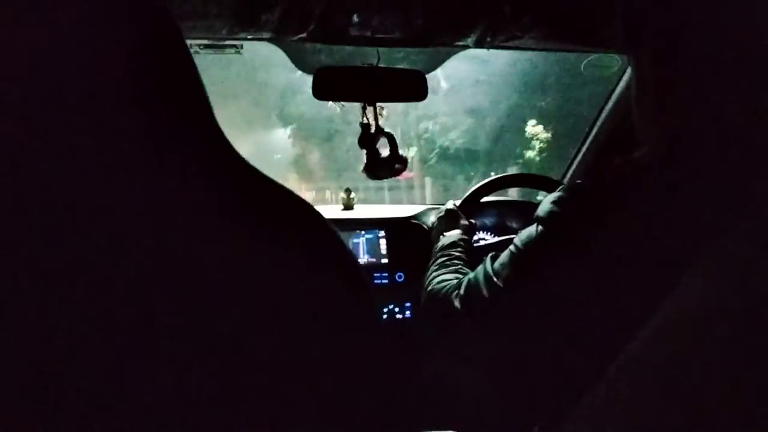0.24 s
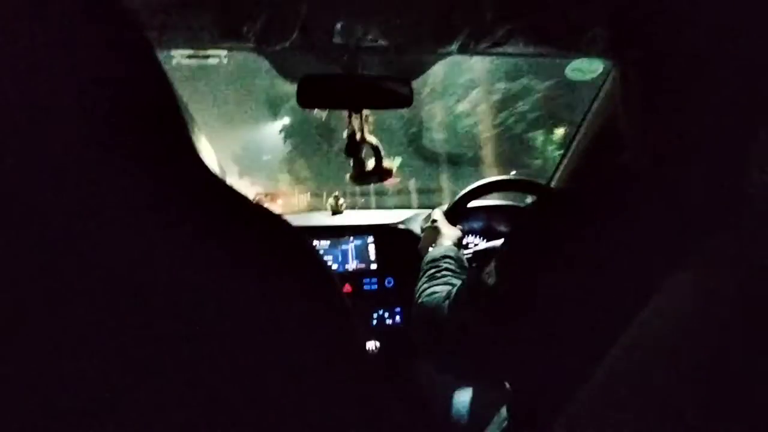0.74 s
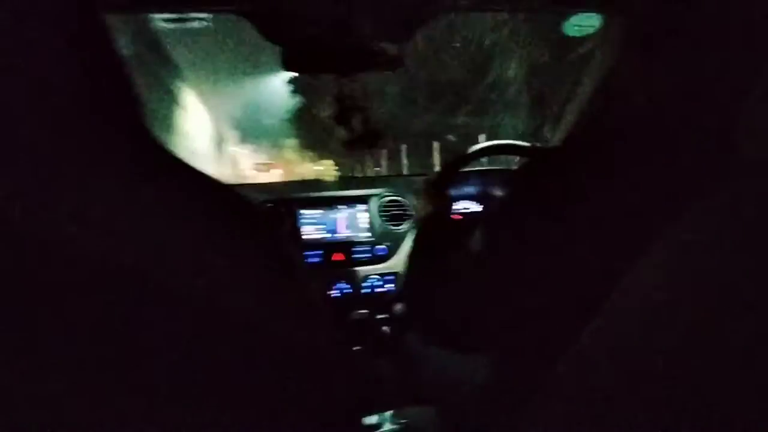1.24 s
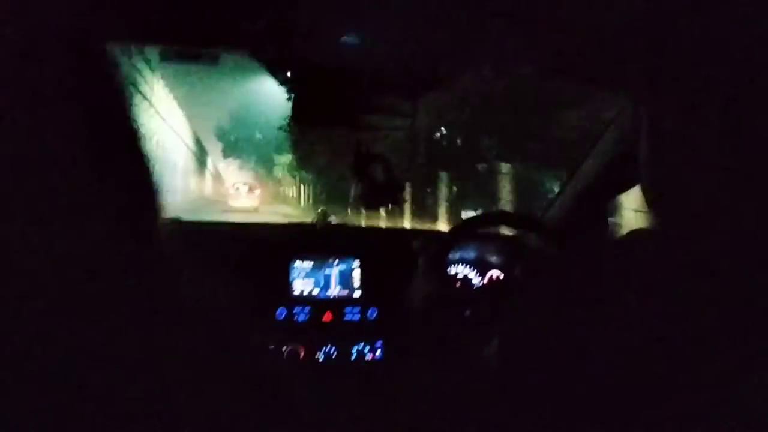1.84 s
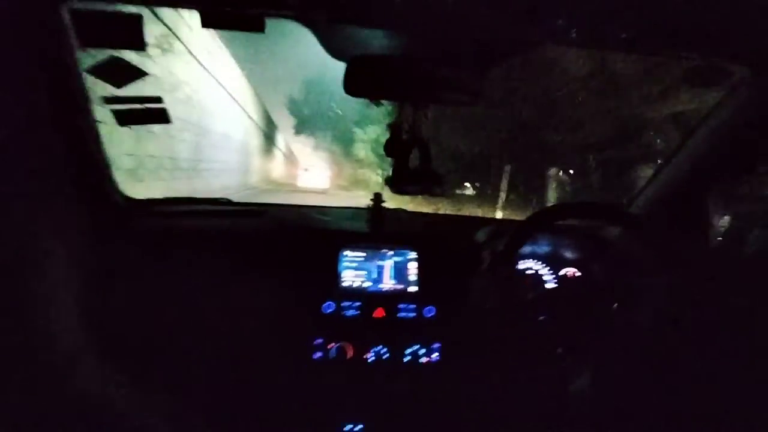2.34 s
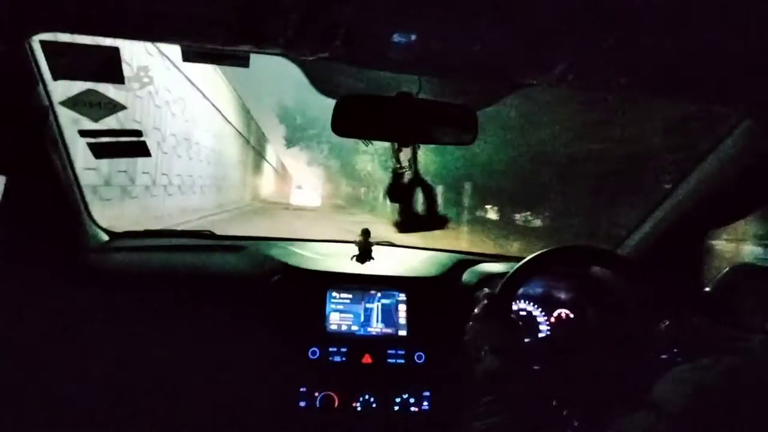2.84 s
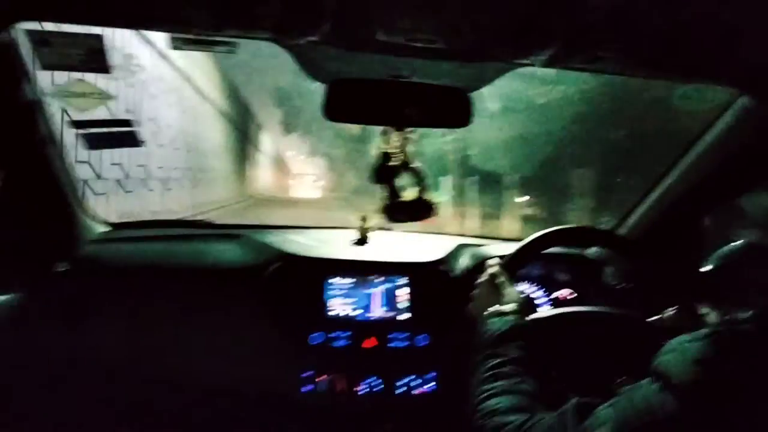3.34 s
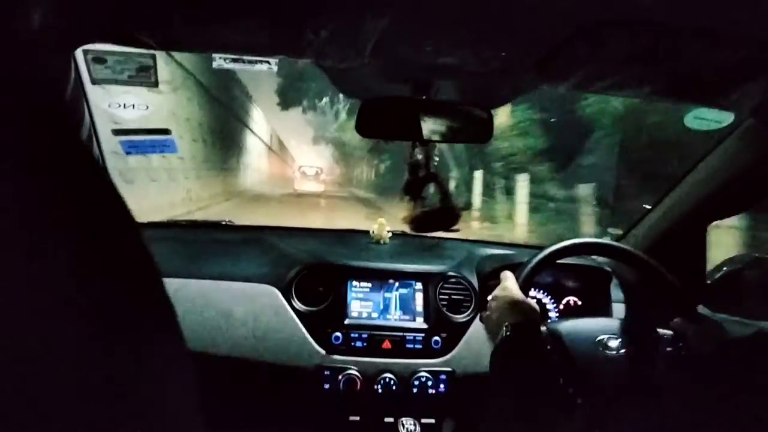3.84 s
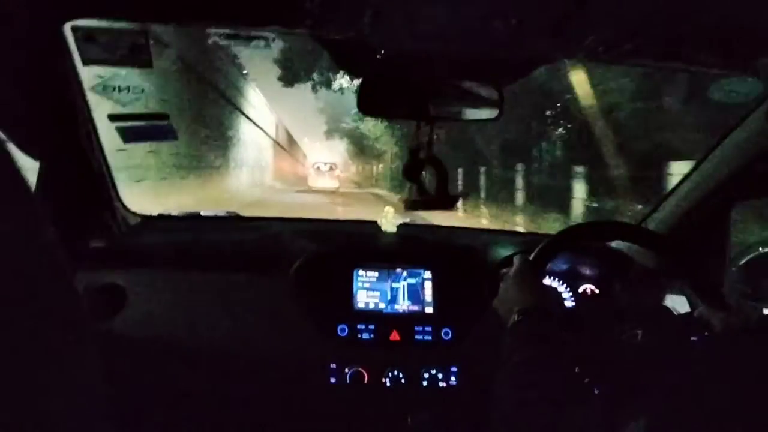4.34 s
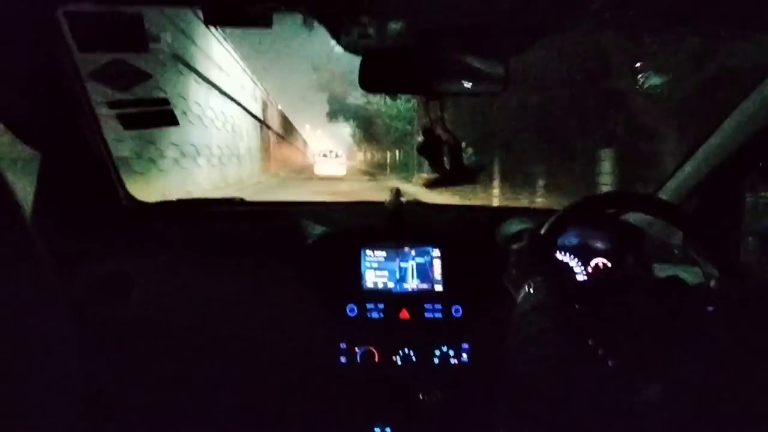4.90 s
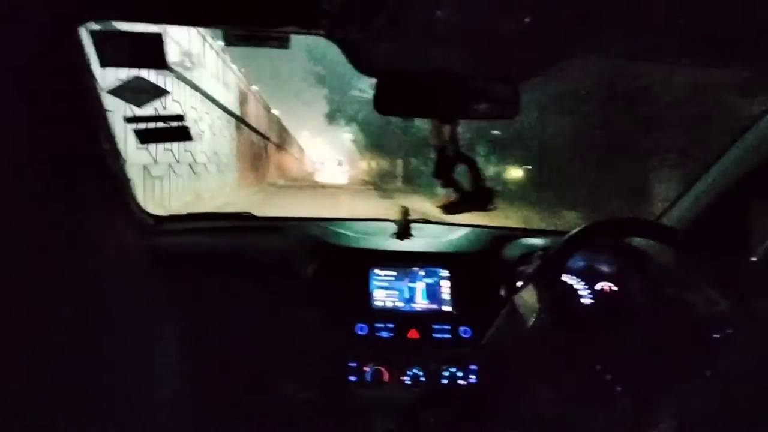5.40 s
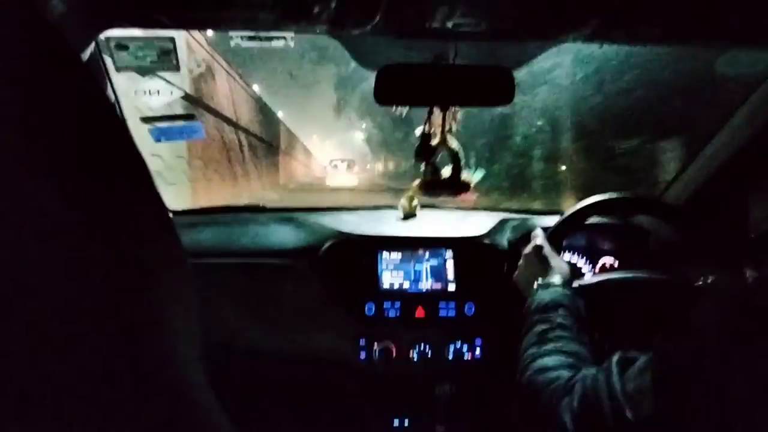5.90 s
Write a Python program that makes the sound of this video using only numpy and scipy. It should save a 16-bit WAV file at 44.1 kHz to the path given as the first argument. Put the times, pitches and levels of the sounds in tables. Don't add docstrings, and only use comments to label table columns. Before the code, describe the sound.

Inside a moving car, low engine hum and rolling road rumble with thuds, brief dropouts and clicks, then a hard booming jolt with rattling panels.

```python
import sys
import numpy as np
from scipy import signal
from scipy.fft import rfft, irfft
from scipy.io import wavfile
from scipy.ndimage import uniform_filter1d

SR = 44100
rng = np.random.default_rng(int(sys.argv[2]) if len(sys.argv) > 2 else 0)


def master_out(mix):
    frames = np.transpose(np.atleast_2d(mix))
    ceiling = np.clip(frames, -1, 1)
    pcm = np.round(ceiling * 32767).astype(np.int16)
    wavfile.write(sys.argv[1], SR, pcm)


def makeup_ratio(level_db):
    decades = np.asarray(level_db, float) / 20
    return 10 ** decades


N = 271567

# pitch_hz, level_db (per Hz)
BOOM_COLOUR = [(7, -34.5), (13, -10.5), (27, 2), (43, 8.5), (60, 1.5), (72, -6.5), (84, -10), (95, -3.5),
               (110, -10.5), (130, -19), (170, -34.5)]
# pitch_hz, level_db (per Hz)
PAN_COLOUR = [(74, -43), (125, -3.5), (156, 7.5), (169, -9.5), (185, -21.5), (240, -65.5), (410, -120)]
# pitch_hz, level_db (per Hz)
ROAR_COLOUR = [(150, -44), (185, -5), (248, -2.5), (341, -10.5), (380, -5), (655, -10.5), (850, -15),
               (1200, -12), (1400, -16), (2100, -21.5), (3000, -28), (4200, -35), (4900, -43),
               (6500, -57.5)]
# pitch_hz, level_db (per Hz)
HISS_COLOUR = [(3000, -9), (4200, -6), (5000, -11.5), (5900, -7.5), (6900, -4.5), (8600, -9.5),
               (10700, -8.5), (12500, -17), (14000, -22.5), (15900, -38.5)]
# pitch_hz, width_hz, lift_db
CABIN_MODES = [(46.4, 42, -4.5), (144.3, 6, 0), (208.2, 45, 9.5), (278.5, 57.8, 8.5), (389, 149, 4.5),
               (978, 21, 4.5), (1310, 140, -3)]
# time_s, level_db
HEAVE = [(0, -28.5), (.12, -28), (.32, -20), (.6, -27.5), (.78, -28), (1.2, -27.5), (1.65, -31),
         (2.05, -27.5), (2.47, -25), (2.6, -34.5), (2.85, -29), (3.45, -31.5), (3.72, -26), (4.2, -23.5),
         (4.36, -19), (4.7, -24), (4.85, -29.5), (6.16, -30)]
# peak_s, level_db
PAN_DRUMS = [(.04, -31.5), (0.259, -31.5), (.43, -46.5), (.62, -36), (0.779, -28), (1.331, -35),
             (1.68, -39.5), (2.2, -38.5), (2.65, -47.5), (2.83, -40.5), (3.66, -43), (4.1, -41),
             (4.339, -31.5), (4.47, -28), (4.56, -26.5), (5.74, -39.5)]
# time_s, level_db
AIR = [(0, -73), (1.18, -76.5), (1.26, -64), (1.34, -66), (1.44, -69), (1.49, -64), (1.95, -63),
       (2.08, -66.5), (2.25, -64.5), (2.73, -66.5), (2.79, -72), (3.7, -73), (4.2, -73.5), (4.7, -72.5),
       (5.9, -73.5), (6.16, -70)]
# time_s, pitch_hz, level_db
ENGINE = [(0, 73, -35), (.7, 75, -36), (1.4, 76, -38), (2, 78, -35), (2.7, 80, -36), (3.5, 80.5, -36),
          (4.2, 81, -33), (4.9, 82, -34), (5.3, 82, -31.5), (5.8, 82, -31.5), (6.16, 82.5, -33)]
# multiple of the firing rate, level_db, fading_db
FIRING_ORDERS = [(.5, -6, 2.5), (1, -1.5, 1.4), (1.5, -19, 3), (3, -22, 3), (5, -30, 3)]
# time_s, pitch_hz, level_db
WHINE = [(0, 1000, -60), (.4, 990, -59), (1, 985, -60), (1.5, 995, -63), (1.9, 1010, -80)]
# start_s, peak_db, centre_hz, t60_s
TICKS = [(0, -43, 5870, 0.049), (.057, -64, 4000, .06), (.861, -52.5, 5870, 0.07), (.9, -60, 10000, 0.093),
         (.93, -47.5, 9700, 0.053), (.966, -61, 4900, .055), (1.054, -57, 8500, .15),
         (1.103, -43, 8000, 0.073), (1.6, -51, 5600, 0.084), (2.244, -57, 6000, .06),
         (2.312, -56, 7000, .12), (2.436, -47.5, 6000, .05), (3.033, -55, 7500, .08),
         (3.056, -49.5, 6540, .09), (3.152, -49, 8260, .075), (3.207, -46.5, 7350, 0.063),
         (3.408, -57.5, 7000, .06), (3.873, -59.5, 7000, .06), (4.146, -57, 6000, 0.055),
         (4.272, -55, 3500, .08), (4.288, -47.5, 5000, .1), (4.308, -50.5, 6000, 0.071),
         (4.341, -48, 2500, .045), (4.433, -54, 3500, 0.04), (4.544, -44.5, 6000, 0.13),
         (4.771, -63, 8900, .05), (5.295, -67, 7500, .06), (5.454, -67, 7000, .05),
         (6.077, -59.5, 9000, 0.13)]
# start_s, peak_db, centre_hz, t60_s
CLINKS = [
    (.273, -54, 6540, 0.013),
    (1.772, -43, 1730, .047),
    (1.773, -49, 3940, .053),
    (3.06, -54, 2230, 0.054),
    (6.111, -52, 7500, .012),
]
# start_s, peak_db, centre_hz, t60_s
SQUEAKS = [
    (.3, -71, 12000, .6),
    (.35, -72, 12000, .6),
]
# start_s, peak_db, centre_hz, t60_s
SHUDDERS = [
    (4.275, -32, 290, 0.38),
    (4.315, -41.5, 352, 0.53),
    (4.36, -37, 393, 0.3),
    (4.545, -32.5, 327, 0.27),
    (4.63, -36.5, 236, 0.55),
]
# pitch_hz, width_hz, lift_db
PORTS = [(3500, 1500, 12), (6900, 1800, 9), (10800, 3800, 9), (15800, 2700, -20)]
# start_s, peak_db, ring_hz, t60_s
BUMPS = [(0.061, -15.5, 73, 0.41), (0.299, -10.5, 50, 0.27), (4.273, -27, 215, 0.48),
         (4.286, -1.5, 52.7, 0.19), (4.364, -0.5, 38.9, 0.15), (4.454, -6.5, 75, 0.12),
         (4.542, -13, 108.5, 0.17), (4.548, -9, 42, 0.13), (4.564, -5.5, 18.1, 0.54), (4.642, -13, 25, .2),
         (5.198, -10.5, 43, 0.1)]
# time_s, pressure jump (full scale 1)
SKIPS = [(.1918, .029), (.6081, -.108), (.6294, -.02), (.8217, .064), (2.3218, -.045), (2.3467, -.01),
         (2.7514, -.037), (2.9861, -.046), (4.046, .03), (4.0887, .061), (4.11, .03), (4.5811, -.16)]
# cut_s, return_s, pressure at the cut, pressure at the return (full scale 1)
GAPS = [
    (.0981, .1488, .029, .024),
    (.4474, .5224, -.036, -.034),
    (.6931, .7573, -.04, -.037),
    (2.5066, 2.5591, .004, .003),
    (3.9244, 4.0029, -.038, -.037),
    (4.4723, 4.538, .14, .15),
]


def evened(x):
    return x / np.sqrt(np.mean(x ** 2) + 1e-20)


def levelled(x, share):
    power = uniform_filter1d(x ** 2, size=3500)
    return evened(x / (power + 0.078) ** share)


def along(rows, column):
    rows = np.array(rows)
    return np.interp(np.arange(N) / SR, rows[:, 0], rows[:, column])


def bell(x, width):
    return np.exp(-.5 * (x / width) ** 2)


def resonance_db(hz, modes):
    return sum(db / (1 + (2 * (hz - mode) / width) ** 2) for mode, width, db in modes)


def add(mix, start_s, sound):
    part = mix[round(start_s * SR):][:len(sound)]
    part += sound[:len(part)]


def wash(colour, size, patchy_db, flicker_db):
    frames, hz = 4 * N // size + 5, np.fft.rfftfreq(size, 1 / SR)
    real, imaginary, patches = rng.standard_normal((frames, len(hz), 3)).T
    patches = uniform_filter1d(patches, size=10, axis=0)
    patches = evened(uniform_filter1d(patches, size=8, axis=1))
    flicker = evened(uniform_filter1d(rng.standard_normal(frames), size=3))
    pitch_hz, level_db = np.transpose(colour)
    colour_db = np.interp(np.log(hz + 1), np.log(pitch_hz + 1), level_db, left=-120, right=-120)
    colour_db = colour_db + resonance_db(hz, CABIN_MODES)
    gain = makeup_ratio(colour_db[:, None] + patchy_db * patches + flicker_db * flicker)
    noise = signal.istft((real + 1j * imaginary) * gain, nperseg=size, noverlap=3 * size // 4)[1]
    return evened(noise[:N])


def road():
    t = np.arange(N) / SR
    heave_db = along(HEAVE, 1)

    joint_start_s, joint_rise_s, joint_end_s = 4.27, 0.036, 4.578
    fade_s, linger_s, lingering_share = .012, .09, .4
    after = np.maximum(t - joint_end_s, 0)
    fade = (1 - lingering_share) * np.exp(-after / fade_s) + lingering_share * np.exp(-after / linger_s)
    joint = np.clip((t - joint_start_s) / joint_rise_s, 0, 1) * fade

    boom = levelled(wash(BOOM_COLOUR, size=8192, patchy_db=2.0, flicker_db=-1.0), 0.23)
    floor_pan = levelled(wash(PAN_COLOUR, size=4096, patchy_db=1.0, flicker_db=2.0), 0.57)
    roar = wash(ROAR_COLOUR, size=2048, patchy_db=1.5, flicker_db=-0.13)
    hiss = wash(HISS_COLOUR, size=512, patchy_db=1.3, flicker_db=1.1)

    pan_rest_db, pan_swell_s = -45.5, 0.033
    pan_gain = makeup_ratio(pan_rest_db) + sum(makeup_ratio(db) * bell(t - peak_s, pan_swell_s) for peak_s, db in PAN_DRUMS)
    roar_db = -45.5 + 0.055 * (heave_db - heave_db.mean())
    roar_gain = np.hypot(makeup_ratio(roar_db), joint * makeup_ratio(-40))
    hiss_gain = np.hypot(makeup_ratio(along(AIR, 1)), joint * fade * makeup_ratio(-62.5))
    return makeup_ratio(heave_db) * boom + pan_gain * floor_pan + roar_gain * roar + hiss_gain * hiss


def engine():
    waver = rng.standard_normal((len(FIRING_ORDERS) + 3, N))
    waver = evened(uniform_filter1d(uniform_filter1d(waver, size=2500), size=2500))
    *fades, whine_fade, whine_drift, engine_drift = waver

    turns = np.cumsum(along(ENGINE, 1) * (1 + .006 * engine_drift)) / SR
    orders = np.zeros(N)
    for (multiple, level_db, fading_db), fade in zip(FIRING_ORDERS, fades):
        tone = np.cos(2 * np.pi * (multiple * turns + rng.random()))
        orders += makeup_ratio(level_db + fading_db * fade) * tone

    whine_turns = np.cumsum(along(WHINE, 1) * (1 + .015 * whine_drift)) / SR
    whine_db = along(WHINE, 2) - 8 + 4 * whine_fade
    sounding = np.arange(N) / SR < WHINE[-1][0]
    whine = makeup_ratio(whine_db) * sounding * np.cos(2 * np.pi * whine_turns)
    return np.sqrt(2) * (makeup_ratio(along(ENGINE, 2)) * orders + whine)


def rattles(events, spread_octaves, rise_s):
    out, size = np.zeros(N), 4096
    t, hz = np.arange(size) / SR, np.fft.rfftfreq(size, 1 / SR)
    port_gain = makeup_ratio(resonance_db(hz, PORTS))
    swell = np.minimum(t / rise_s, 1) * np.hanning(2 * size)[size:]
    draws = rng.standard_normal((len(events), 2, size))
    for (start_s, peak_db, centre_hz, t60_s), (noise, grain) in zip(events, draws):
        part = bell(np.log2((hz + 1) / centre_hz), spread_octaves)
        puff = irfft(rfft(noise) * part * port_gain)
        grain_db = 1.5 * evened(uniform_filter1d(grain, size=90))
        puff = evened(puff * makeup_ratio(grain_db))
        add(out, start_s, makeup_ratio(peak_db - 60 * t / t60_s) * puff * swell)
    return out


def bumps():
    out, t = np.zeros(N), np.arange(SR // 2) / SR
    for start_s, peak_db, ring_hz, t60_s in BUMPS:
        swell = 1 - np.exp(-3.0 * ring_hz * t)
        ring = -np.sin(2 * np.pi * ring_hz * t) * swell
        add(out, start_s, makeup_ratio(peak_db - 60 * t / t60_s) * ring)
    return out


def scene():
    trim = rattles(TICKS, spread_octaves=1.0, rise_s=0.0035)
    trim += rattles(CLINKS, spread_octaves=0.29, rise_s=0.0011)
    trim += rattles(SQUEAKS, spread_octaves=.06, rise_s=.02)
    trim += rattles(SHUDDERS, spread_octaves=0.57, rise_s=0.0058)
    return (road() + engine() + trim + bumps())[None]


def top_cut(x):
    return signal.sosfilt(signal.butter(12, 16640, fs=SR, output="sos"), x)


def record(dry):
    t = np.arange(N) / SR
    x = dry[0] + makeup_ratio(-82) * rng.standard_normal(N)
    x = signal.oaconvolve(x, signal.firwin(2047, 15740, window=("kaiser", 7), fs=SR), "same")

    def near(seam_s):
        return bell(t - seam_s, .006)

    for skip_s, jump in SKIPS:
        x = x + jump / 2 * np.where(t < skip_s, -1, 1) * near(skip_s)
    for cut_s, return_s, before, after in GAPS:
        cut_pull = (before - x[round(cut_s * SR)]) * near(cut_s)
        return_pull = (after - x[round(return_s * SR)]) * near(return_s)
        x = x + cut_pull + return_pull
        x = x * ((t < cut_s) | (t >= return_s))
    x = x - x[-1] * near(N / SR)
    x = signal.oaconvolve(x, signal.firwin(255, 16500, fs=SR), "same")
    x = x + (.13 - x[0]) * near(0)
    return top_cut(x[None])


dry = scene()
out = record(dry)
master_out(out)
```